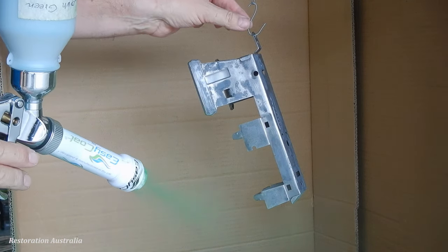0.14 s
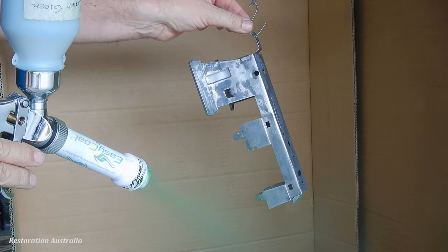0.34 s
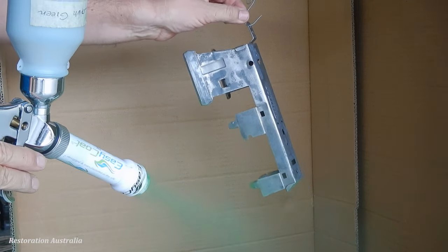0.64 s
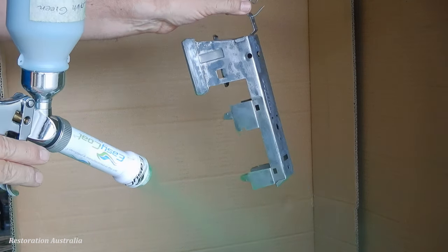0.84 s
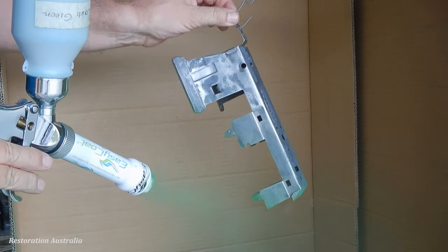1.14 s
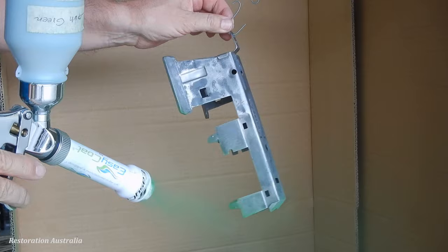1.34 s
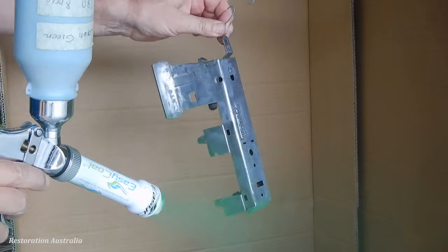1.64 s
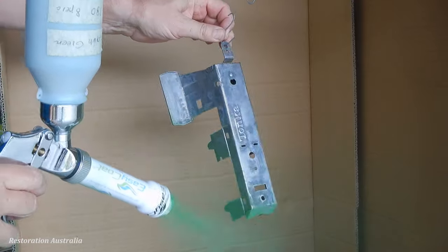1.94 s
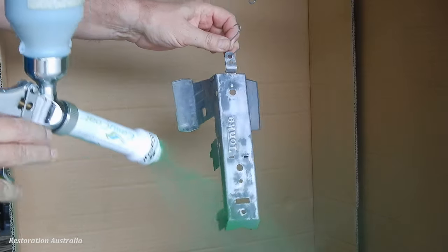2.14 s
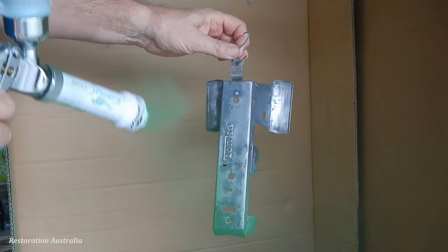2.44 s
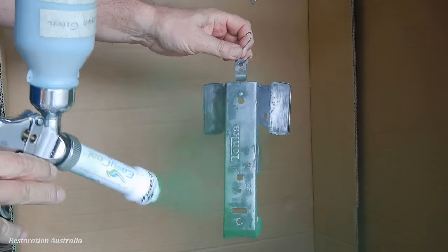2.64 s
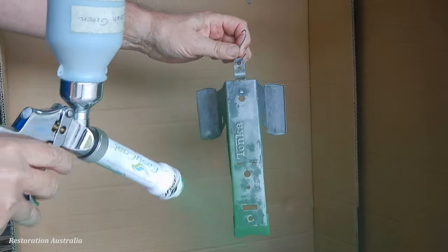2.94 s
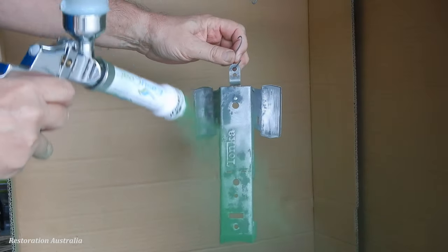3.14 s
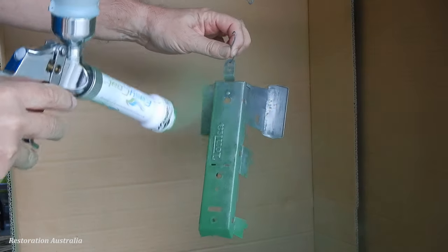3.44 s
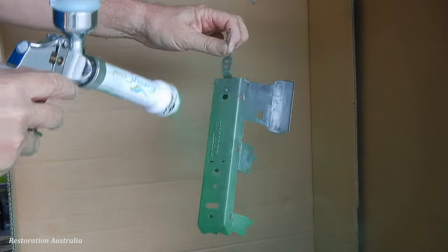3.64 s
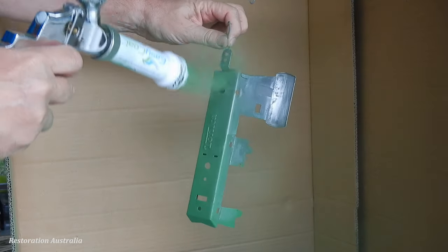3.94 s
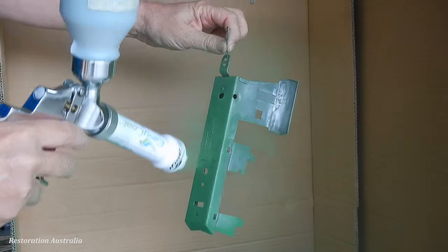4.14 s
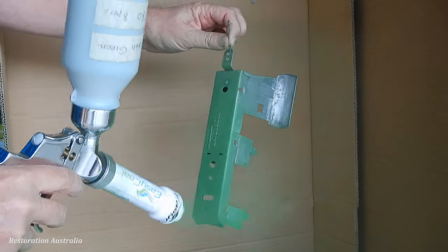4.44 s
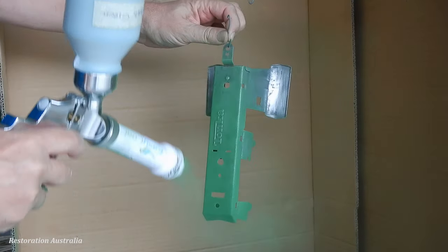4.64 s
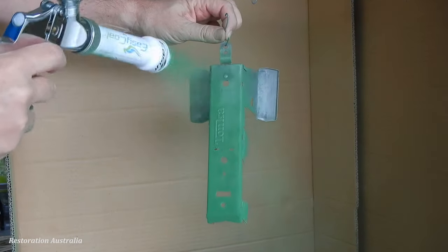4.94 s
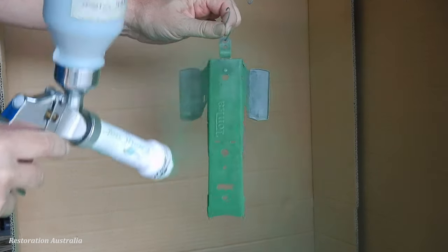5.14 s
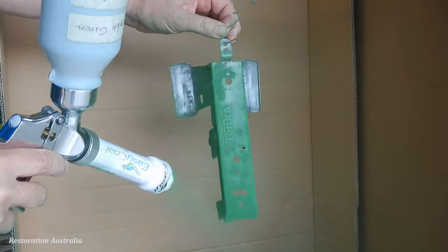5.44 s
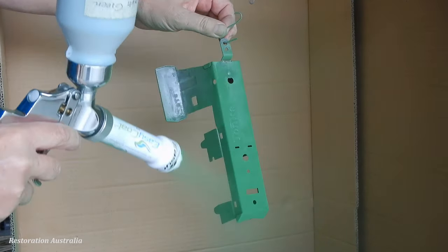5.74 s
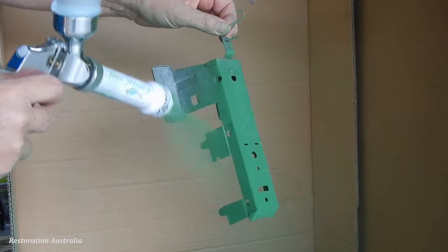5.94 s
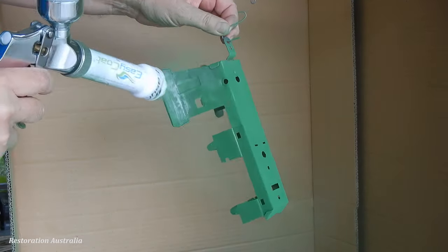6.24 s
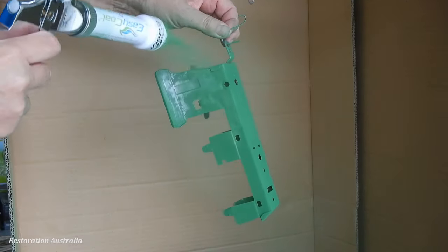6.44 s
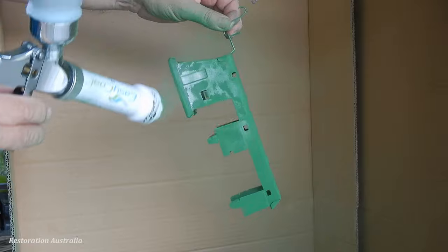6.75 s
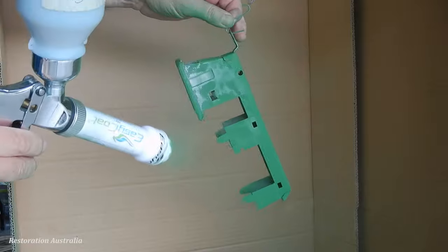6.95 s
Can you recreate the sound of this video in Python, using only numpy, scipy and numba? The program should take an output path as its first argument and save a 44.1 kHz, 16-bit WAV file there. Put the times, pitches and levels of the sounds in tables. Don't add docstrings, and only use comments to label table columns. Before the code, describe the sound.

Thin, whistling compressed-air hiss, broken by brief rough bursts of spray and small metallic ticks, inside a cardboard booth.

```python
import sys
import numpy as np
from scipy import signal
from scipy.fft import rfft, irfft, next_fast_len
from scipy.io import wavfile
from scipy.ndimage import uniform_filter1d
from numba import njit

SR = 44100
rng = np.random.default_rng(int(sys.argv[2]) if len(sys.argv) > 2 else 0)


def how_loud(loudness_db):
    steps = np.asarray(loudness_db, float) / 20
    return 10 ** steps


def digitize_waveform(pressure):
    field = np.atleast_2d(pressure).T
    bounded = np.clip(field, -1, 1)
    quanta = np.round(bounded * 32767).astype(np.int16)
    wavfile.write(sys.argv[1], SR, quanta)


N = 313551


def set_rms(x, db):
    return x * how_loud(db) / np.sqrt(np.mean(x ** 2))


def colour(x, points, peaks=()):
    taps = 4096
    hz = np.maximum(np.fft.rfftfreq(taps, 1 / SR), 1)
    at, db = np.transpose(points)
    db = np.interp(np.log(hz), np.log(at), db)
    for f, width, gain in peaks:
        db = db + gain / (1 + (2 * (hz - f) / width) ** 2)
    cepstrum = irfft(np.log(how_loud(db)))[:taps // 2]
    cepstrum[1:] *= 2
    impulse = irfft(np.exp(rfft(cepstrum, taps)))
    return signal.fftconvolve(x, impulse[None], axes=1)[:, :N]


def split(x, edges_hz, blur):
    size = next_fast_len(N)
    log_hz = np.log(np.fft.rfftfreq(size, 1 / SR) + 1)
    spectrum = rfft(x, size)
    below = [0] + [.5 - .5 * np.tanh((log_hz - np.log(f)) / blur) for f in edges_hz] + [1]
    return [irfft(spectrum * (high - low), size)[:, :N] for low, high in zip(below, below[1:])]


def walk(rate):
    knots = np.repeat(rng.standard_normal(4096), 8)
    knots = uniform_filter1d(uniform_filter1d(knots, 8), 8)
    return np.interp(np.arange(N) * (8 * rate / SR), np.arange(len(knots)), knots / knots.std())


def curves(tables):
    s, *columns = np.vstack(tables).T
    return [np.interp(np.arange(N) / SR, s, c) for c in columns]


def steer(bands, db, rels_db, shared_db, own_db, rate):
    shared = shared_db * walk(rate)
    total = 0
    for band, rel_db in zip(bands, rels_db):
        total = total + band / band[0].std() * how_loud(db + rel_db + shared + own_db * walk(rate))
    return total


@njit
def moving_bandpass(x, g, k):
    y = np.empty_like(x)
    for c in range(len(x)):
        b, l = 0., 0.
        for i in range(len(g)):
            v = (b + g[i] * (x[c, i] - l)) / (1 + g[i] * (g[i] + k[i]))
            b, l, y[c, i] = 2 * v - b, l + 2 * g[i] * v, k[i] * v
    return y


def lift(x, hz, width_hz, db):
    return x + how_loud(db) * moving_bandpass(x, np.tan(np.pi * hz / SR), width_hz / hz)


# frequency in Hz, density in dB per Hz.
SHOP_COLOUR = [(12, -37.5), (20, -10), (114, 0), (157, -3.5), (228, -8.5), (441, -9.5), (482, -16),
               (517, -11.5), (629, -16.5), (930, -12.5), (1400, -13), (1820, -21.5), (3080, -120)]
# frequency in Hz, width in Hz, rms level in dB.
SHOP_HUMS = [
    (110, 14, -71),
    (524, 11, -81),
]
# time in seconds, rise in dB, half length in seconds.
TRAFFIC_SWELLS = [
    (0.584, 5, 0.56),
    (4.7, 5, 0.23),
]


def shop():
    t = np.arange(N) / SR
    rumble = set_rms(colour(rng.standard_normal((2, N)), SHOP_COLOUR), -56)
    deep, rest = split(rumble, (200,), .2)
    swell_db = sum(db * np.exp(-((t - s) / half) ** 2) for s, db, half in TRAFFIC_SWELLS)
    out = deep * how_loud(swell_db - 0.65) + rest
    for f, width, db in SHOP_HUMS:
        hum = signal.lfilter(*signal.iirpeak(f, f / width, fs=SR), rng.standard_normal((2, N)))
        out = out + set_rms(hum, db)
    return out


# start in seconds, peak level in dB,
# dull ring in Hz, bright ring in dB relative to it, 60 dB decay in seconds.
CONTACTS = [(.4965, -25, 2700, -34, 0.0064), (0.5403, -36, 890, -30, 0.014), (.541, -40, 617, -35, 0.022),
            (0.541, -45, 260, -32, 0.081), (.5412, -39, 430, -33, .014), (0.542, -38, 1300, -31, .01),
            (0.5423, -30, 1890, -36, .006), (2.4902, -24.5, 1440, -5, 0.0067),
            (2.4966, -24, 2540, -21, 0.016), (2.845, -38, 1500, -14.5, .01), (3.507, -38, 2840, -1, 0.013),
            (6.339, -45.5, 1490, 5, 0.009), (6.372, -24, 1680, -6.5, 0.008), (6.378, -33, 2310, -11, 0.016)]


def ticks():
    out, t = np.zeros((2, N)), np.arange(4096) / SR
    for s, db, hz, bright_db, t60 in CONTACTS:
        fade = np.exp(-np.log(1000) * t / max(t60, .002)) * np.minimum(2.5 * t * hz, 1)
        dull = np.sin(2 * np.pi * hz * t)
        bright = np.sin(2 * np.pi * 5200 * t) + np.sin(2 * np.pi * 4300 * t)
        bright = bright + 0.23 * np.sin(2 * np.pi * 6300 * t)
        start = int(s * SR)
        out[:, start:start + len(t)] += how_loud(db) * fade * (dull + how_loud(bright_db) * bright)
    wash = how_loud(-29.0) * rng.standard_normal((2, len(t))) * np.exp(-np.log(1000) * t / 0.15)
    out = out + signal.fftconvolve(out, wash, axes=1)[:, :N]
    return signal.sosfilt(signal.butter(8, 6800, fs=SR, output="sos"), out)


def walls(count, far_ms, sway_ms, db):
    x, n = rng.standard_normal((2, N)), np.arange(N)
    out = x.copy()
    for distance, size in rng.random((count, 2)):
        path_ms = 1 + far_ms * distance + sway_ms * walk(.9)
        lag = np.round(n - SR / 1000 * path_ms).astype(int).clip(0, N - 1)
        out[0] += how_loud(db - 6.9 * distance) * (2 * size - 1) * x[0, lag]
    return out


TRAVEL_S = .012
# frequency in Hz, density in dB per Hz.
BLEED_SPECTRUM = [(900, -20.5), (1380, -24.5), (1950, -1.5), (3150, -4.5), (3450, -9), (4300, -15),
                  (5000, -13), (5350, -33), (6500, -30), (7200, -42.5), (8500, -41), (9500, -45.5),
                  (11000, -55.5), (13500, -72)]
# frequency
# in Hz, width in Hz, lift in dB (negative for a dip).
BOOTH_RINGS = [(1200, 25, 10), (1520, 85, 5.5), (1674, 200, 6), (2000, 60, 3), (2113, 66, 2.5),
               (2326, 24, 3.5), (2540, 39, -16), (2870, 160, 2), (3085, 54, 2.5), (3272, 130, 3.5),
               (3597, 110, 5.5), (4124, 140, 6), (6640, 260, 2.5), (9850, 370, -15)]
# time in seconds, nozzle whistle in Hz,
# barrel ring in Hz, whistle lift in dB, lower flank lift in dB.
GUN_AIM = [(0, 4690, 2590, -0.5, 2), (.63, 4750, 2550, .5, -.5), (1.2, 4700, 2400, 1, -3),
           (1.9, 4730, 2570, -0.5, 0), (2.4, 4610, 2500, -2, -1), (2.62, 4790, 2315, -1, 0),
           (3.0, 4630, 2760, -3, -1), (3.19, 4830, 2380, 2, 0), (3.3, 4460, 2760, -0.5, 1.5),
           (3.9, 4580, 2570, 1.5, 2), (4.4, 4730, 2510, -.5, -2.5), (4.75, 4710, 2680, -.5, 1),
           (4.92, 4430, 2330, -0.5, -1), (5.3, 4470, 2640, 0, 0), (5.7, 4720, 2680, -1, -0.5),
           (6.06, 4430, 2350, -3.5, -5.5), (6.3, 4840, 2410, 2.5, 3.5), (7.11, 4620, 2730, 2.5, -1.5)]
# time in seconds, barrel level in dB.
HAND_FLOW = [(0, -43), (.6, -44.5), (.83, -40), (1.1, -40), (1.35, -41.5), (1.9, -41), (2.45, -40),
             (2.98, -39), (3.1, -39), (3.65, -37), (3.92, -37), (4.5, -38.5), (5.3, -39.5), (5.65, -37.5),
             (5.9, -42.5), (6.35, -39.5), (6.9, -36), (7.11, -38.5)]
# level in dB, share of a change in flow.
BLEED_PARTS = [
    (-44, 0.14),
    (-41.5, 1),
    (-51.5, 0.25),
    (-65.5, 0.22),
]


def bleed():
    t = np.arange(N) / SR
    whistle_hz, barrel_hz, whistle_db, flank_db = curves([GUN_AIM])
    flow_db = curves([HAND_FLOW])[0] + 41
    lead_db, lead_s = 3.5, .06
    sag_db, recover_s = -5, 0.13
    for opens, shuts, *_ in TRIGGER_PULLS:
        lead = np.exp(np.minimum(t - opens, 0) / lead_s) * (t < opens)
        sag = np.exp(-np.maximum(t - shuts, 0) / recover_s) * (t >= opens)
        flow_db = flow_db + lead_db * lead + sag_db * sag
    flow_db = uniform_filter1d(flow_db, int(TRAVEL_S * SR))
    air = colour(walls(count=10, far_ms=14, sway_ms=.16, db=-0.5), BLEED_SPECTRUM, BOOTH_RINGS)
    air = lift(air, whistle_hz, 200., 13.5)
    air = lift(air, barrel_hz, 450., 2.5)
    air = lift(air, 1.635 * whistle_hz, 500., 0.44)
    aim_db = (flank_db, 0, whistle_db, 0.83 * walk(4.3))
    rels_db = [db + share * flow_db + a for (db, share), a in zip(BLEED_PARTS, aim_db)]
    bands = split(air, (2300, 3380, 5200), 0.033)
    return steer(bands, -0.69, rels_db, shared_db=0.85, own_db=0.8, rate=220)


RING_REF_DB = -34


def spits():
    rings_hz, usual_ms, per_second = (2145, 2350, 2820), 3, 28
    rows = []
    for opens, shuts, _, first, last in TRIGGER_PULLS:
        for when, size, ring, long in rng.random((int(per_second * (shuts - opens)), 4)):
            barrel_db = first + when * (last - first) - RING_REF_DB
            db = -34 + 6.5 * (2 * size - 1) + .5 * barrel_db
            hz = rings_hz[int(ring * len(rings_hz))]
            rows.append((opens + when * (shuts - opens), db, hz, usual_ms * (.5 + long)))
    return rows


# time in seconds, peak level in dB, ring in Hz, length in ms.
CLOTS = [(2.069, -27.5, 3220, 11), (2.104, -24, 2180, 6.6), (2.124, -27.5, 2340, 74),
         (2.161, -30, 2490, 18), (2.203, -33.5, 2280, 11.6), (2.581, -24.5, 2000, 21),
         (2.606, -27, 2540, 18), (2.658, -43, 2280, 5.6), (2.676, -27.5, 2380, 30), (2.7, -29, 2350, 14),
         (2.723, -26.5, 2420, 10), (2.759, -27, 2850, 10), (4.037, -25.5, 2770, 15),
         (4.048, -25, 1920, 4.4), (4.097, -27.5, 1770, 6.8), (4.148, -31, 2920, 19),
         (4.832, -26.5, 2310, 11), (4.859, -18.5, 1840, 3.3), (4.905, -29, 2170, 7.5),
         (5.008, -32, 2930, 16), (6.003, -25.5, 2240, 8.6), (6.064, -30, 2480, 17), (6.147, -26, 2334, 27),
         (6.204, -22, 2320, 5.3), (6.459, -26.5, 2014, 22), (6.545, -28, 3080, 7.2),
         (6.603, -22, 2850, 3.1), (6.614, -20, 2060, 5.1), (6.626, -24.5, 2177, 35), (6.638, -28, 2950, 5)]
# time in seconds, peak level in dB, ring in Hz.
WEAK_CLOTS = [(.949, -34, 2080), (1.54, -35.5, 2450), (1.706, -32.5, 3160), (1.731, -34.5, 2650),
              (2.252, -29.5, 2820), (2.992, -31, 3100), (3.171, -32, 2280), (3.344, -35, 2940),
              (3.497, -31, 2760), (4.012, -30, 2820), (4.116, -28.5, 2850), (4.222, -30, 1770),
              (4.936, -27.5, 2110), (4.976, -32.5, 3020), (5.085, -32, 2800), (5.129, -32, 2750),
              (5.279, -34, 2260), (5.65, -34, 3070), (5.737, -32, 3020), (6.091, -27, 2390),
              (6.379, -44, 2110), (6.476, -30, 2110), (6.591, -29, 2100), (6.875, -30, 2840)]


def puffs():
    before, after = 512, 1024
    out, t = np.zeros((2, N)), np.arange(-before, after) / SR
    clots = [*CLOTS, *[(*row, 9) for row in WEAK_CLOTS], *spits()]
    for (s, db, hz, ms), noise in zip(clots, rng.standard_normal((len(clots), 2, len(t)))):
        half_s = max(ms, 2) / 1000 * np.where(t < 0, .13, .5)
        swell = np.exp(-(t / half_s) ** 2)
        wobble = 0.69 * signal.lfilter(*signal.butter(1, 150, fs=SR), noise) * 9
        ring = np.cos(2 * np.pi * hz * t + wobble)
        rush = signal.lfilter(*signal.iirpeak(2300, 1.6, fs=SR), noise)
        peak = int(s * SR)
        out[:, peak - before:peak + after] += how_loud(db + 1) * swell * (ring + .8 * rush)
    return signal.sosfilt(signal.butter(3, (1450, 3500), "band", fs=SR, output="sos"), out)


# frequency in Hz, density in dB per Hz.
SPURT_SPECTRUM = [(200, -22), (500, -15.5), (1050, -12.5), (1700, -7), (2400, -6), (3150, -8),
                  (3500, -14.5), (4900, -20), (5400, -26.5), (6800, -32), (8700, -37), (9500, -59.5),
                  (10800, -51.5), (12800, -54.5)]
# level in dB, share of a change in barrel ring.
SPURT_PARTS = [
    (-46.5, 0.12),
    (-36, 1),
    (-44, 0.8),
    (-54, 0.26),
]
# open in seconds, shut in seconds, flow in dB,
# barrel ring at the start in dB, barrel ring at the end in dB.
TRIGGER_PULLS = [
    (2.056, 2.267, -1.5, -26, -30),
    (2.571, 2.766, 0.5, -27.5, -32),
    (3.169, 3.417, 0, -34, -33),
    (4.01, 4.233, -1, -31, -35),
    (4.815, 5.156, -1, -29.5, -33.5),
    (5.993, 6.22, 0, -29, -33.5),
    (6.445, 6.642, -3, -30.5, -19),
]


def spurts():
    t = np.arange(N) / SR
    valve, courses = 0, []
    for opens, shuts, flow, first, last in TRIGGER_PULLS:
        opening = np.sin(np.pi / 2 * np.clip((t - opens) / TRAVEL_S + .6, 0, 1)) ** 2
        valve = valve + opening * np.exp(-np.maximum(t - shuts, 0) / .01)
        courses.append([(opens, flow, first - RING_REF_DB), (shuts, flow, last - RING_REF_DB)])
    flow_db, ring_db = curves(courses)
    whistle_hz, barrel_hz, whistle_db, _ = curves([GUN_AIM])
    rings = [(f, width, 0.5 * gain) for f, width, gain in BOOTH_RINGS]
    rings.append((507, 120, 6.2))
    air = colour(walls(count=8, far_ms=10, sway_ms=.15, db=0.0), SPURT_SPECTRUM, rings)
    air = lift(air, whistle_hz, 380., 10 + whistle_db)
    air = lift(air, barrel_hz, 400., 4)
    surge_db = 0.87 * walk(22)
    rels_db = [db + share * ring_db for db, share in SPURT_PARTS]
    bands = split(air, (1450, 3380, 5200), 0.054)
    return valve * steer(bands, flow_db - 4.0 + surge_db, rels_db, shared_db=0.5, own_db=1.7, rate=170)


# frequency in Hz, scattered part in dB.
PORT_SCATTER = [(20, -14), (300, -11), (1000, -11), (2000, -18), (3000, -23.5), (4700, -8), (6500, -3.5),
                (8000, -2), (14000, 6.5)]


def scene():
    direct, scattered = shop() + ticks() + bleed() + puffs() + spurts()
    scattered = colour(scattered[None], PORT_SCATTER)[0]
    return np.array([direct + scattered, direct - scattered])


def band_limit(x):
    return signal.sosfilt(signal.butter(12, 13500, fs=SR, output="sos"), x)


# frequency in Hz, left minus right in dB.
PORT_SHADING = [(20, 0), (900, -1.3), (1800, -0.7), (3000, 0.5), (3800, 4), (4400, 6), (5000, 0),
                (8000, 0.2), (14000, 1.5)]


def record(dry):
    left = colour(dry[:1], [(f, db / 2) for f, db in PORT_SHADING])
    right = colour(dry[1:], [(f, -db / 2) for f, db in PORT_SHADING])
    mix = np.tanh(2 * np.vstack([left, right])) / 2
    return band_limit(mix)


dry = scene()
out = record(dry)
digitize_waveform(out)
```